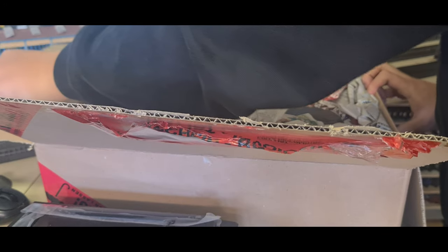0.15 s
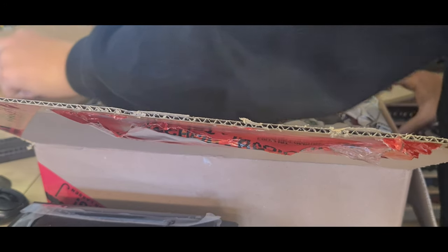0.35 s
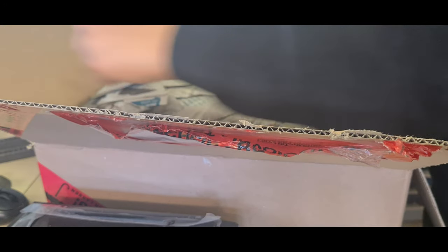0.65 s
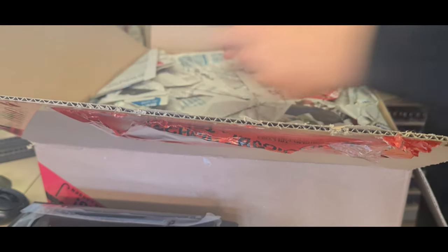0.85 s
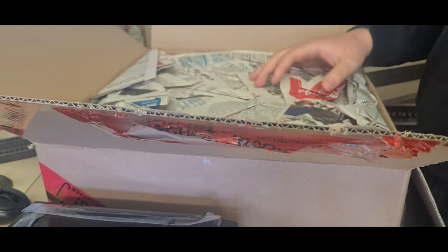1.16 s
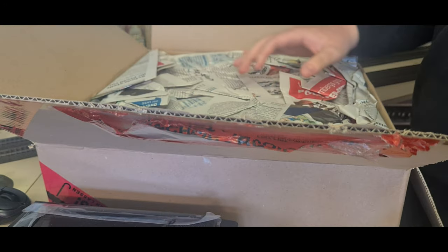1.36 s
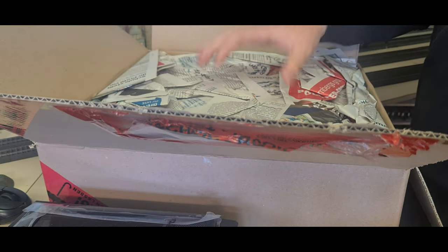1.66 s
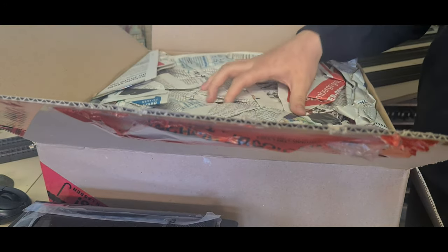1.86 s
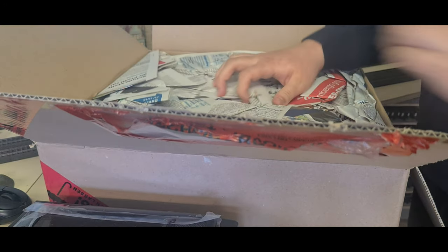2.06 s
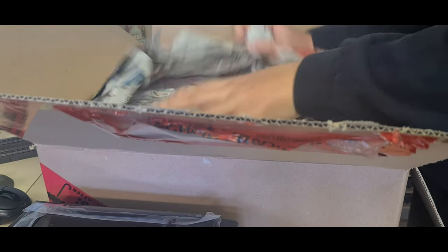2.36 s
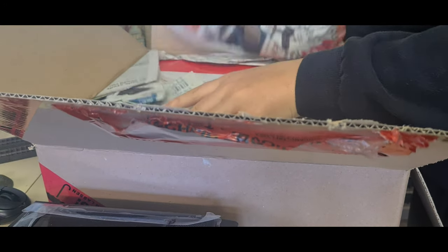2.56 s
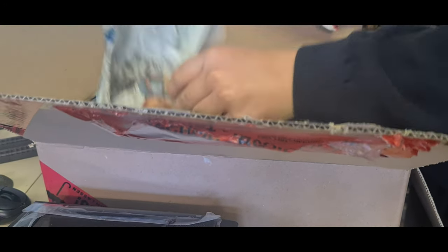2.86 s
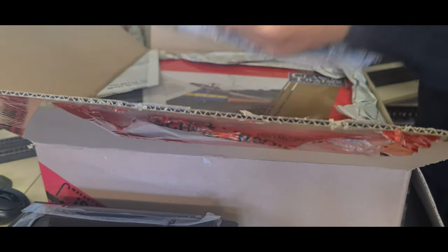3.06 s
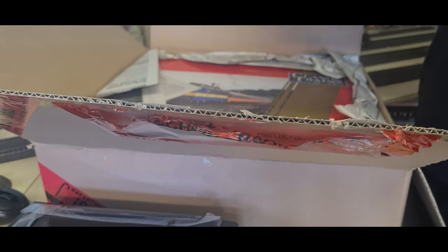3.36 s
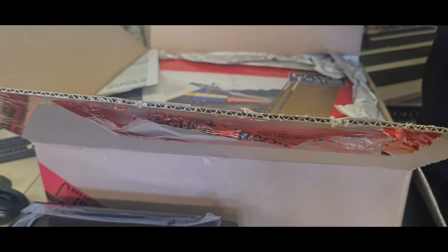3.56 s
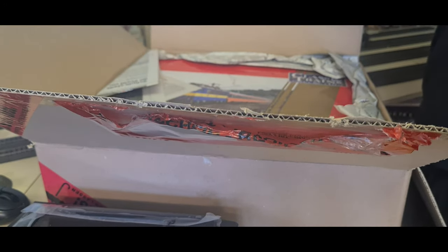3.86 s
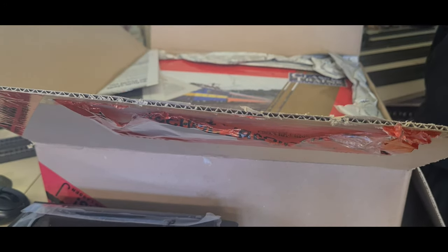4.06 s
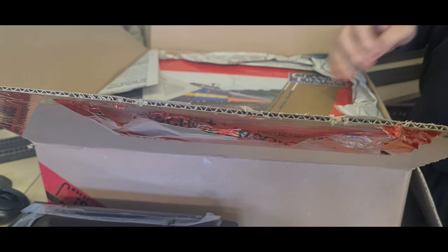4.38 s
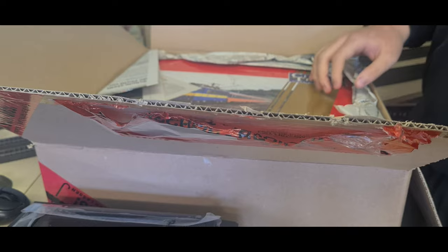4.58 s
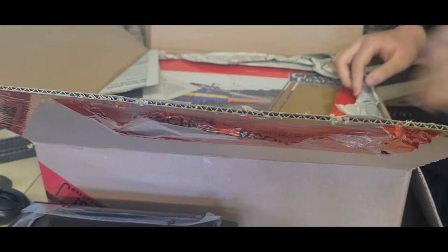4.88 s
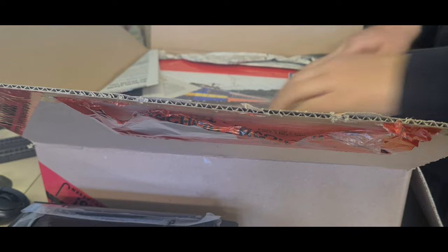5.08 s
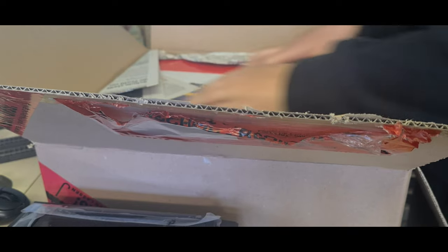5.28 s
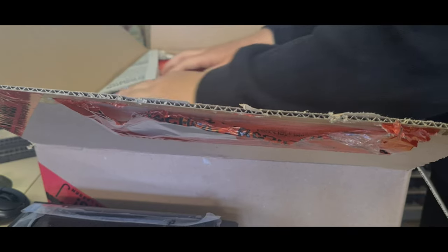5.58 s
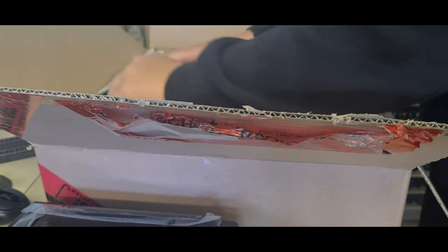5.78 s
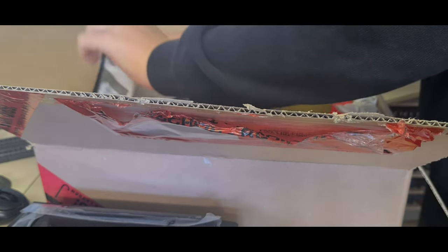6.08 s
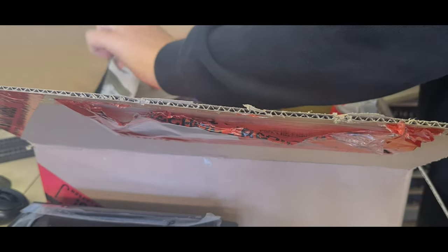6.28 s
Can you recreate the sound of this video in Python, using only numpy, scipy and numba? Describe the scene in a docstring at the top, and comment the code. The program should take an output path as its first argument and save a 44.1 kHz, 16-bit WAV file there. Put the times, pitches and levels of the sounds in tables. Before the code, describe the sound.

Close, dry stereo pickup in a quiet room. Over a second and a half of almost nothing but faint ticks, then a hard object knocks and rattles rapidly on a table. Paper rustling swells thick and crackly with a heavy thud on the box, pauses, returns in a second loud spell, then a short scraping judder, one more bright crinkle and quieter ticks and bumps.

```python
"""Paper rustles and crackles at close range as hands dig through a cardboard box in a quiet room.
Rustle and sharp snaps are showers of short dying sines, from creases and from the clatter of the knocks.
Something hard knocks on the table and rattles out as ringing modes; soft blows thud on the box.
The box judders once as it slides, each slip kicking its walls. Two ports hear it, with lag and level
between them, over a thin room tail and faint noise."""
import sys
import numpy as np
from scipy import signal
from scipy.fft import rfft, irfft
from scipy.io import wavfile
from numba import njit

SR = 44100
rng = np.random.default_rng(int(sys.argv[2]) if len(sys.argv) > 2 else 0)


def waveform_to_disk(signal):
    """Save audio, clipped to [-1, 1], as 16-bit WAV at the path in sys.argv[1]."""
    frames = np.transpose(np.atleast_2d(signal))
    scaled = np.clip(frames, -1, 1) * 32767
    samples = np.round(scaled).astype(np.int16)
    wavfile.write(sys.argv[1], SR, samples)


N = 283636

# Tone colour of the rustle. Each row: frequency in Hz, relative level in dB per Hz.
RUSTLE_COLOUR = [(24, -45), (40, -40), (420, 3), (553, -10.5), (747, 2.5), (825, -5), (1230, 0.5),
                 (1580, -4), (3190, -3), (9110, -23), (13300, -25), (15800, -39)]
RUSTLE_TREBLE_DB, RUSTLE_BASS_DB = -14.5, -3.5  # treble and bass of that colour against its middle
# Path of the hands. Each row: time in seconds, lag of left behind right in samples,
# left minus right in dB (before the limits in grains).
HAND_PATH = [(0, -6.5, -4.5), (1.6, -6, -5), (2.0, -4.5, -0.8), (3.3, -3.5, -1), (4.0, 5, -2.5),
             (4.6, 25, -9.5), (5.3, 13, -3.5), (5.6, -5, -4), (6.0, -5, 0.5), (6.43, -6.5, -2)]
# Swells of rustling noise, from handled paper and from the clatter around the knocks.
# Each row: time of full strength in seconds, swell by 20 dB in ms, hold in ms (sign ignored),
# sink by 20 dB in ms, rustle level in dB, treble above it in dB, bass above it in dB,
# strongest crinkle in Hz.
SWELLS = [(0.0, 50, -1, 135, -61, -17, 3, 880), (0.359, 94, 0, 110, -59.5, -17, -5, 1030),
          (0.476, 63, 1, 101, -57, -11.5, -0.5, 876), (0.613, 47, 4, 120, -59, -10, -8, 1380),
          (0.66, 50, -3, 495, -72.5, 3, 6, 1420), (1.054, 26, 0, 21, -53.5, -30, -5, 1410),
          (1.08, 21, 13, 500, -76.5, 6, 3, 1190), (1.681, 189, 18, 28, -64, -17, 3, 1210),
          (1.7, 8, 0, 59, -42.5, -19.5, 3, 716), (1.757, 8, 1, 50, -33, -12, 4, 900),
          (1.81, 30, 22, 56, -38, -9.5, 3, 800), (1.87, 19, 13, 402, -51, -5.5, 10, 680),
          (2.039, 34, 26, 202, -47, -3, 19, 1370), (2.178, 122, 83, 202, -43, -5, -13, 1570),
          (2.402, 278, 108, 121, -33.5, -12.5, -8.5, 1160), (2.6, 120, 61, 202, -38.5, -8.5, 1, 1140),
          (2.719, 211, 270, 40, -35.5, -9, -4, 1160), (3.008, 21, -10, 124, -52, -5.5, -6.5, 1660),
          (3.25, 205, 1, 29, -64, -16, -16.5, 1270), (3.272, 17, -10, 128, -65.5, -14, -9, 1470),
          (3.336, 56, -2, 69, -52.5, -23, -47, 1420), (3.401, 31, 83, 55, -43, -13.5, -10, 1400),
          (3.52, 21, 3.5, 153, -26.5, -10.5, -7, 1280), (3.6, 69, 91, 154, -37, -7, -15, 1350),
          (3.74, 215, 27, 64, -32.5, -11.5, -5.5, 1040), (3.822, 45, 165, 111, -34.5, -13, -12, 1240),
          (4.039, 99, 32, 77, -41.5, -6, -20, 900), (4.26, 106, -17.5, 29, -65, -10, -14.5, 900),
          (4.286, 29.5, 3, 67, -51.5, -23, -18.5, 1890), (4.38, 15, 90, 109, -48, -10, -48, 2420),
          (4.498, 120, 74, 202, -37.5, -9, -8.5, 1680), (4.827, 43, 46, 259, -48, -10.5, -4.5, 1110),
          (4.958, 97, 0, 200, -49, -6, -26, 1920), (5.027, 19, 55, 89, -30, -6, -17, 2040),
          (5.12, 32, 88, 193, -38.5, -6.5, -6, 1670), (5.472, 37, 99, 48, -50.5, 4.5, -2.5, 1910),
          (5.6, 50, 3, 400, -59, 5.5, 2, 2330), (5.76, 65, 120, 111, -59, -5.5, 15, 1290),
          (5.921, 18, 16, 42, -51, 18.5, -12, 1700), (5.985, 239, -4, 217, -47.5, -0.5, -10, 1410),
          (6.2, 204, 142, 103, -60, -8, -4.5, 1250), (6.387, 65, 9, 132, -56.5, -2.5, 2, 1350)]
# The heap settling between swells. One row: rustle level in dB, treble in dB, bass in dB, crinkle in Hz.
SETTLING = (-78, -25.5, 7.5, 1196)
# Sharp snaps and ticks: creases popping, plus the crack and rattle of the knocks.
# Each row: start in seconds, pop level in dB, centre in Hz, edge level in dB.
SNAPS = [(0.3547, -50, 1110, -74), (0.4822, -58, 1130, -55), (0.599, -49.5, 1380, -77),
         (1.0518, -46, 1170, -67), (1.055, -46, 2000, -76), (1.6946, -21, 1080, -59),
         (1.7535, -10, 2100, -19), (1.795, -18.5, 1110, -41.5), (1.8598, -25.5, 1150, -36),
         (1.8726, -37, 1070, -41), (1.888, -36, 1110, -51), (1.9015, -66, 1350, -36),
         (1.9378, -38, 1100, -42.5), (1.981, -41, 2460, -40.5), (2.0008, -45, 1790, -45),
         (2.0282, -21, 3370, -51), (2.0494, -47, 1860, -35), (2.1553, -54, 1040, -41),
         (2.2129, -36, 2760, -45), (2.264, -24.5, 2060, -50), (2.303, -24.5, 1440, -48),
         (2.331, -34, 1240, -34), (2.3773, -20.5, 2150, -52), (2.4103, -25, 805, -44),
         (2.512, -25, 2100, -39), (2.5987, -27, 1180, -32.5), (2.71, -38, 1150, -46),
         (2.731, -37, 1280, -33), (2.796, -25, 1270, -39), (2.8986, -28, 1060, -52),
         (2.9419, -34, 5500, -30), (2.983, -12.5, 3200, -38), (3.264, -38.5, 1590, -41),
         (3.3342, -44, 1460, -73), (3.3959, -31.5, 2050, -43), (3.4758, -35, 1050, -35),
         (3.52, -23, 1240, -43), (3.5862, -25, 2260, -47), (3.6106, -36, 1400, -52),
         (3.7185, -23, 1040, -34), (3.769, -24, 1100, -28.5), (3.818, -29, 1840, -31),
         (3.8415, -29, 1860, -34), (3.9991, -37, 1080, -27), (4.0826, -46, 4440, -29),
         (4.2461, -54, 1900, -65.5), (4.2786, -36, 5830, -53.5), (4.286, -39, 2850, -61),
         (4.294, -45, 3080, -60), (4.317, -33.5, 6300, -54.5), (4.3763, -37, 2930, -49),
         (4.455, -33, 2070, -45), (4.5335, -36, 1860, -34), (4.822, -33.5, 1180, -58),
         (4.8556, -33, 1150, -40.5), (4.944, -36, 1200, -42), (5.022, -24, 2530, -44),
         (5.0661, -11.5, 3350, -40), (5.468, -34, 1970, -45), (5.543, -35, 4500, -46),
         (5.8935, -28, 6460, -51), (5.9263, -20.5, 6900, -31), (5.9778, -38, 1020, -50),
         (5.9958, -33, 1360, -33.5), (6.056, -35, 1360, -45), (6.274, -46, 2500, -54),
         (6.3784, -47, 1290, -44.5)]
# Soft thuds of hands on the box. Each row: start in seconds, level in dB, wall tone in Hz, T60 in seconds.
THUDS = [(0.462, -50, 123, 0.08), (1.824, -17, 108, 0.071), (2.166, -28.5, 257, 0.051),
         (2.631, -3.5, 238, 0.017), (2.653, -17, 72.7, 0.052), (2.71, -26, 95, 0.064),
         (2.976, -25.5, 389, 0.035), (3.515, -30.5, 332, 0.043), (3.713, -41.5, 428, 0.12),
         (3.809, -46, 352, 0.059), (4.024, -42, 484, 0.057), (4.437, -44, 145, 0.05),
         (5.032, -36, 430, 0.16), (5.393, -36, 94.7, 0.064), (5.417, -27, 194, 0.043),
         (5.45, -27.5, 230, 0.04), (5.46, -34, 311, 0.052), (5.579, -35, 69.6, 0.032),
         (5.891, -38, 262, 0.035), (5.907, -43, 258, 0.08), (6.182, -36, 303, 0.023),
         (6.387, -37.5, 221, 0.055), (6.412, -48, 205, 0.062)]
# Hard knocks on the table. Each row: start in seconds, level in dB, contact time in ms.
KNOCKS = [(1.695, -6.5, 1.4), (1.706, -7, 2), (1.753, -4.5, 0.58), (1.762, -22, 1.1), (1.794, -5, 1.1),
          (1.815, -10.5, 1.2), (1.85, -17, 1.2), (1.861, -11, 1.3), (1.889, -9.5, 1.5), (1.91, -18, 1.6),
          (1.954, -19, 1.2), (1.972, -16, 2.3), (2.055, -20, 1.67), (2.068, -29, 1.6)]
# Ringing modes of the table. Each row: frequency in Hz, level in dB, T60 in seconds.
TABLE_MODES = [(124, -32, 0.19), (232, -12.5, 0.08), (307, -8, 0.034), (382.5, -13.5, 0.11),
               (436, -4.5, 0.071), (476, -3, 0.033), (512, -4, 0.064), (529, -30, 0.037), (704, -6, 0.062),
               (770, -4, 0.032), (857, -12, 0.082), (1074, -12.5, 0.093), (1206, 6, 0.016)]
# Modes of the box walls. Each row: frequency in Hz, width in Hz, level in dB.
BOX_MODES = [(77, 25, -36), (113.6, 12, -6), (194, 37, 3), (239, 65, 9), (324, 84, 2), (350, 30, -4.5),
             (727, 47, -3)]
# Tone colour of the room noise. Each row: frequency in Hz, relative level in dB per Hz.
AIR_COLOUR = [(18, -39), (30, -27), (75, -3.5), (161, -8.5), (193, 1), (301, -32), (775, -12.5), (931, -23),
              (2870, -20), (5990, -29), (7780, -39), (15800, -28.5)]

AIR_DB = -73  # RMS of the noise, both ports averaged
SNAP_CYCLES, SNAP_SHOWER_MS = 22, 2.8  # T60 of the pop in cycles; mean delay of its shower
SLIDE_S, SLIDE_ENDS_S = 4.518, 4.8
SLIPS_PER_S, SLOWING_PER_S2, SLOWEST_SLIPS_PER_S = 98, 230, 44
JUDDER_DB, JUDDER_FULL_S, JUDDER_FADES_S = -36.5, 4.57, 4.63
JUDDER_SWELL_DB_S, JUDDER_SINK_DB_S = 297, 220
BRIGHT_DB_OCT, DULL_DB_OCT = 4.5, -22.5  # tilt before and after the fade begins
ROOM_T60_S, ROOM_DB, ROOM_TOP_HZ = 0.25, -10, 7000
TOP_HZ = 15900


def undb(db):
    """Turn dB into gain."""
    return 10 ** (np.asarray(db) / 20)


def colour(table, hz):
    """Read a tone colour in dB, interpolated over log frequency."""
    table_hz, db = np.transpose(table)
    return np.interp(np.log(hz), np.log(table_hz), db)


@njit
def ring(out, start, hz, t60, rise, left, right, lag):
    """Add a dying sine per grain, swelling in over rise s; the left port hears it lag samples later."""
    for k in range(len(start)):
        turn = np.exp(2j * np.pi * hz[k] / SR - np.log(1000.) / (t60[k] * SR))
        left_start = start[k] + max(lag[k], 0)
        right_start = start[k] + max(-lag[k], 0)
        rise_step = np.exp(-1 / (rise[k] * SR))
        z, unrisen = 1 + 0j, 1.
        for i in range(min(int(t60[k] * SR), out.shape[1] - max(left_start, right_start))):
            wave = z.imag * (1 - unrisen)
            out[0, left_start + i] += left[k] * wave
            out[1, right_start + i] += right[k] * wave
            z *= turn
            unrisen *= rise_step
    return out


def hand_pan_db(s):
    """Left minus right in dB, following the hands."""
    path_s, _, pan_db = np.transpose(HAND_PATH)
    return np.interp(s, path_s, pan_db)


def grains(s, hz, t60, gain, pan_db, lag_spread=0., rise=0.):
    """Place dying sines at times s, lagging between the ports according to where the hands are."""
    settings = np.broadcast_arrays(s, hz, t60, gain, pan_db, lag_spread, rise)
    s, hz, t60, gain, pan_db, lag_spread, rise = (1. * v.ravel() for v in settings)
    path_s, path_lag, _ = np.transpose(HAND_PATH)
    lag = np.round(np.interp(s, path_s, path_lag) + lag_spread).astype(np.int64)
    start = np.clip(s * SR, 0, N).astype(np.int64)
    # the bass bends round the phone, so it differs less between the ports
    pan_db = np.clip(pan_db, -7, 7) * np.clip(hz / 500, .3, 1)
    left, right = gain * undb(pan_db / 2), gain * undb(-pan_db / 2)
    hz = np.clip(hz, 30, SR * .4)
    return ring(np.zeros((2, N)), start, hz, np.abs(t60) + 1e-4, np.abs(rise) + 1e-6, left, right, lag)


def air():
    """Faint room noise: shaped Gaussian noise, nearly alike at both ports in the bass."""
    hz = np.maximum(np.arange(N // 2 + 1) * SR / N, 1)
    mid, side = rfft(rng.standard_normal((2, N))) * undb(colour(AIR_COLOUR, hz))
    side = side * np.clip(hz / 1800, .15, 1)
    noise = irfft(np.array([mid + side, mid - side]), N)
    return noise * undb(AIR_DB) / np.sqrt(np.mean(noise.mean(0) ** 2))


def swells(s):
    """Sum the power of all swells at times s; the loudest dominate treble, bass and crinkle."""
    t = np.arange(0, N / SR, .001)
    full_s, swell_ms, hold_ms, sink_ms, db, *tones = np.transpose(SWELLS)[:, :, None]
    early_ms = np.maximum(1000 * (full_s - t), 0)
    late_ms = np.maximum(1000 * (t - full_s) - np.abs(hold_ms), 0)
    drop_db = 20 * (early_ms / np.abs(swell_ms) + late_ms / np.abs(sink_ms))
    power = undb(db - drop_db) ** 2
    settling_power = undb(SETTLING[0]) ** 2
    total = power.sum(0) + settling_power
    curves = [10 * np.log10(total)]
    for tone, idle in zip(tones, SETTLING[1:]):
        curves.append(((power * tone).sum(0) + settling_power * idle) / total)
    return [np.interp(s, t, curve) for curve in curves]


def rustle(count=7000, size=20):
    """Bursts at random times, as of buckling creases, each shed a short shower of ticks of every pitch."""
    when, burst_size, place, lag, stray = rng.random((count, 5)).T[:, :, None]
    delay, pitch, tick_size, sign = rng.random((count, size, 4)).transpose(2, 0, 1)
    s = when * N / SR - .005 * np.log(1 - delay)  # ticks trail off over about 5 ms
    high = np.sqrt(pitch)  # high ticks outnumber low ones, as small creases do large ones
    hz = 60 * 241.4 ** high
    mid_db, treble_db, bass_db, crinkle_hz = swells(s)
    bass_db = np.minimum(bass_db, 3)  # paper alone never booms
    # short high ticks are spread over more Hz
    db = mid_db + colour(RUSTLE_COLOUR, hz) + 20 * np.log10(hz / 1000)
    db += np.clip(np.log2(hz / 2500) / 1.48, 0, 1) * (treble_db - RUSTLE_TREBLE_DB)
    db += np.clip(np.log2(700 / hz) / 0.31, 0, 1) * (bass_db - RUSTLE_BASS_DB)
    # each swell favours one pitch, and each burst strays from it at random
    octaves_off = np.log2(hz / crinkle_hz) + 1.34 * (stray - .5)
    facet = np.exp(-octaves_off ** 2 / 0.031)
    db += 3.7 * facet - 10 * np.log10(high + 0.063)  # the second term offsets the crowding of high ticks
    # many small, few large
    db += np.minimum(-2.3 * np.log(1 - burst_size), 11)
    db += np.minimum(-(1.0 + 1.0 * facet) * np.log(1 - tick_size), 10)
    pan_db = hand_pan_db(s) + 6 * (place - .5)
    t60 = (8.83 + 8 * facet) / hz + 0.00015
    gain = undb(db - 11) * np.sign(sign - .5)
    return grains(s, hz, t60, gain, pan_db, 9 * (lag - .5), 0.11 / hz)


def snaps(size=24):
    """A sharp snap or tick: a pop at its own pitch with a treble edge, then a shower that thins out."""
    s, db, hz, edge_db = np.transpose(SNAPS)[:, :, None]
    pan_db = hand_pan_db(s)
    pop_hz = hz * np.array([1, 1.7])
    pop = grains(s + .0003, pop_hz, SNAP_CYCLES / pop_hz, undb(db + np.array([0.5, -4])), pan_db)

    delay, detune, sign, edge_delay = rng.random((len(SNAPS), size, 4)).transpose(2, 0, 1)
    sign = np.sign(sign - .5)
    edge_s = s + .0003 + .004 * edge_delay ** 2
    edge_hz = np.geomspace(2500, 14000, size)
    edge_db = edge_db + np.linspace(15, 5, size) - 8 * edge_delay  # weaker towards the top and when late
    edge = grains(edge_s, edge_hz, 0.00091, undb(edge_db) * sign, pan_db, 0, .00006)

    late = -np.log(1 - delay)
    octaves = np.linspace(-1.2, 2.2, size) + 0.13 * detune
    shower_s = s + .001 + late * SNAP_SHOWER_MS / 1000
    shower_hz = hz * 2 ** octaves
    # weaker when late and away from the pitch of the pop
    fade_db = -4 * late - 12 * (1 - np.exp(-octaves ** 2 / 0.5))
    gain = undb(db + fade_db - 8.5) * sign
    shower = grains(shower_s, shower_hz, 23.0 / shower_hz, gain, pan_db, 0, 0.136 / shower_hz)
    return pop + edge + shower


def thuds():
    """A dull blow on the box: one wall tone, a weaker overtone and a boom below."""
    s, db, hz, t60 = np.transpose(THUDS)[:, :, None]
    part_hz = hz * np.array([1, 1.6, .45])
    part_t60 = t60 / np.array([1, 1.5, .6])
    gain = -undb(db + np.array([1.5, -6, -8]))
    return grains(s, part_hz, part_t60, gain, -2.1, 0, 0.93 / hz)


def knocks():
    """Each knock rings the modes of the table; a longer contact weakens the high ones."""
    s, db, contact_ms = np.transpose(KNOCKS)[:, :, None]
    hz, mode_db, t60 = np.transpose(TABLE_MODES)
    # each knock lands on another spot, shifting the pitch and level of every mode
    spot, strike = rng.standard_normal((len(KNOCKS), len(TABLE_MODES), 2)).transpose(2, 0, 1)
    mode_db = mode_db + 3 * strike
    detune = 1 + .015 * spot
    softness = 1 / (1 + (hz * contact_ms / 1000) ** 2) ** 1.5
    gain = -undb(db + mode_db - 4.0) * softness
    return grains(s + 0.001, hz * detune, t60, gain, -4.0, 0, contact_ms / 1500)


def judder():
    """Stick-slip: slips kick the box walls, slowing to a floor and turning dull as they fade."""
    t = np.arange(SLIDE_S, SLIDE_ENDS_S, 1 / SR)
    rate = np.maximum(SLIPS_PER_S - SLOWING_PER_S2 * (t - SLIDE_S), SLOWEST_SLIPS_PER_S)
    slip_count = np.floor(np.cumsum(rate) / SR)
    slips = t[1:][np.diff(slip_count) > 0][:, None]
    db = JUDDER_DB - JUDDER_SWELL_DB_S * np.maximum(JUDDER_FULL_S - slips, 0)
    db = db - JUDDER_SINK_DB_S * np.maximum(slips - JUDDER_FADES_S, 0)
    uneven = rng.standard_normal((len(slips), 2))
    slips = slips + .0005 * uneven[:, :1]
    db = db + 2.5 * uneven[:, 1:]
    tilt_db_oct = np.interp(slips - JUDDER_FADES_S, [-.03, .04], [BRIGHT_DB_OCT, DULL_DB_OCT])
    hz, width_hz, mode_db = np.transpose(BOX_MODES)
    t60 = np.log(1000) / np.pi / width_hz  # a narrow mode rings long
    gain = -undb(db + tilt_db_oct * np.log2(hz / 160) + mode_db)
    return grains(slips, hz, t60, gain, -0.85, 0, 0.00072)


def room(dry):
    """Walls of box and room return a dull, thin, dying tail, unlike left and right above the bass."""
    t = np.arange(int(.5 * SR)) / SR
    decay = undb(-60 * t / ROOM_T60_S) * np.clip(t / 0.0012, 0, 1)
    mid, side = rng.standard_normal((2, len(t))) * decay
    side = signal.lfilter(*signal.butter(1, 900, "high", fs=SR), side)
    tail = np.array([mid + side, mid - side])
    tail = signal.lfilter(*signal.butter(1, ROOM_TOP_HZ, fs=SR), tail)
    tail = signal.lfilter(*signal.butter(1, 350, "high", fs=SR), tail)
    tail = tail * undb(ROOM_DB) / np.sqrt(np.sum(tail ** 2) / 2)
    return signal.fftconvolve(dry.mean(0)[None], tail, axes=1)[:, :N]


def scene():
    """Mix everything at the box with its room tail and the air."""
    dry = rustle() + snaps() + thuds() + knocks() + judder()
    return dry + room(dry) + air()


def record(dry):
    """The phone drops the deepest bass, rounds the loudest peaks and cuts the top."""
    x = signal.sosfilt(signal.butter(4, 48, "high", fs=SR, output="sos"), dry)
    x = .8 * np.tanh(x / .8)
    return signal.sosfilt(signal.ellip(12, .2, 90, TOP_HZ, fs=SR, output="sos"), x)


dry = scene()
out = record(dry)
waveform_to_disk(out)
```